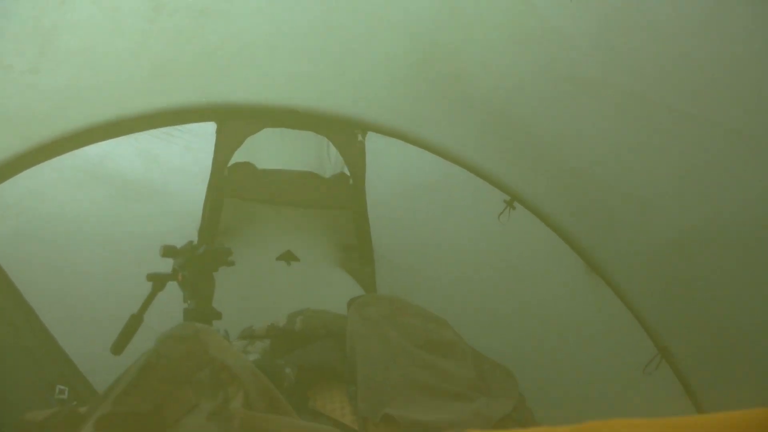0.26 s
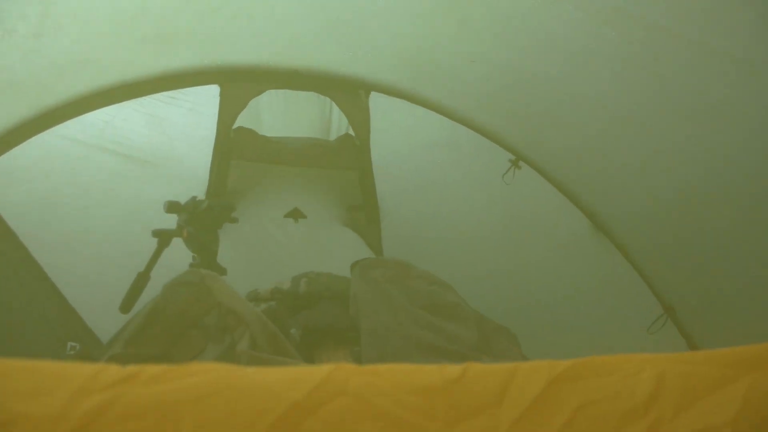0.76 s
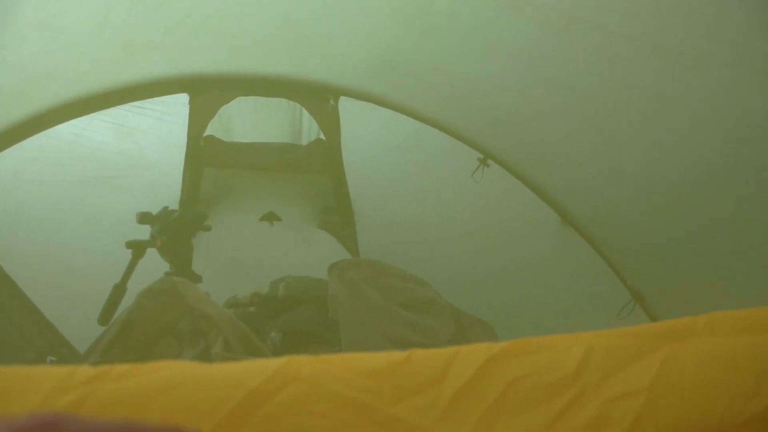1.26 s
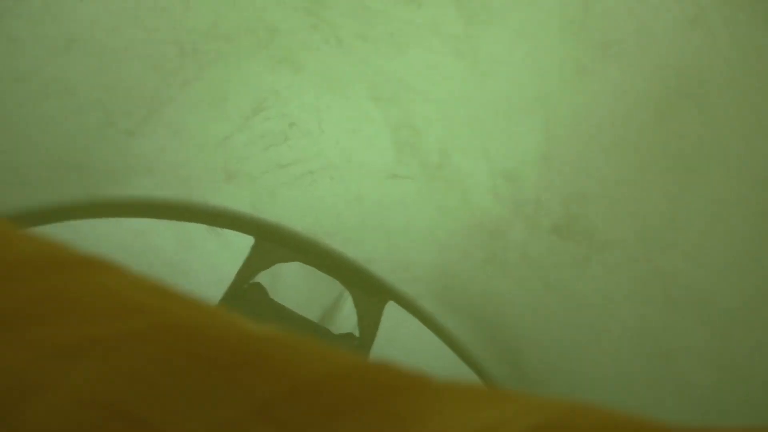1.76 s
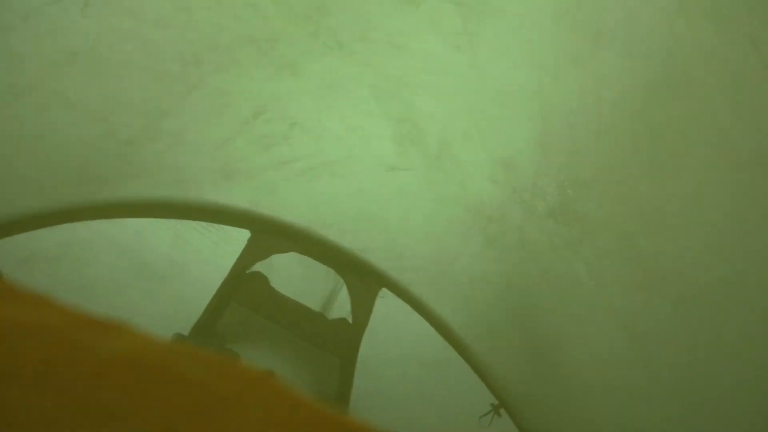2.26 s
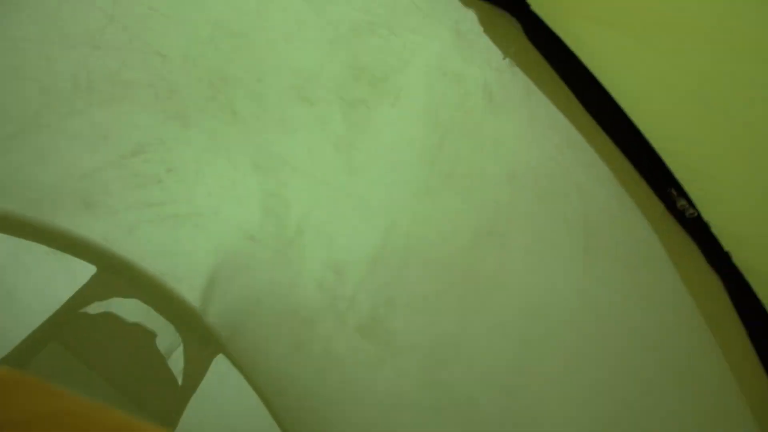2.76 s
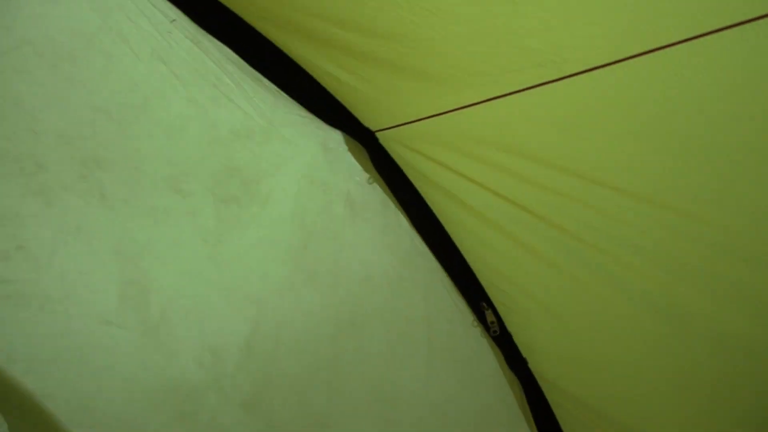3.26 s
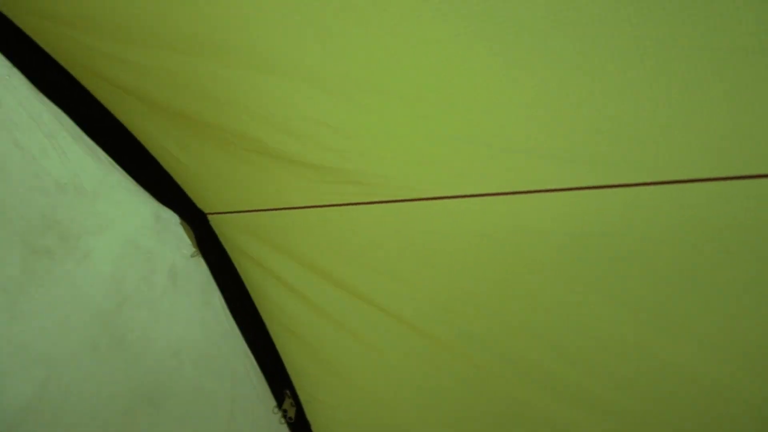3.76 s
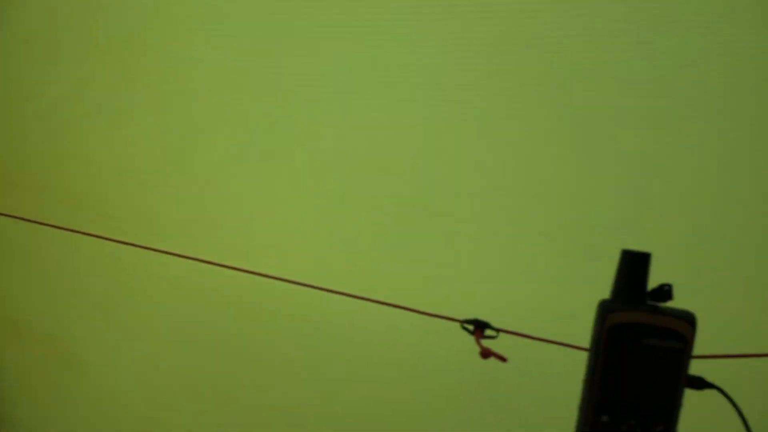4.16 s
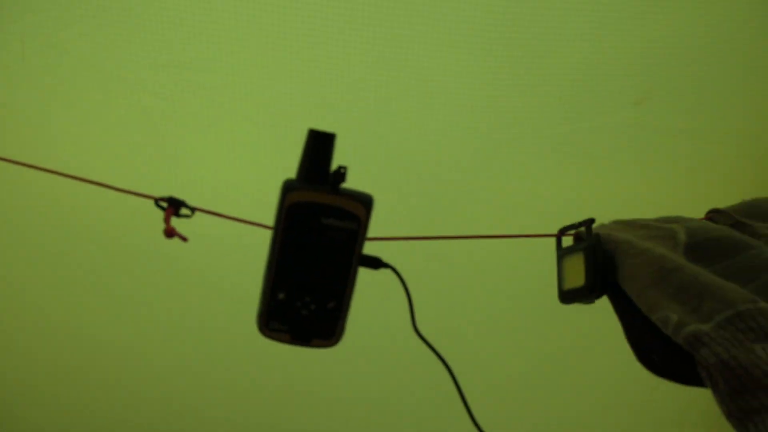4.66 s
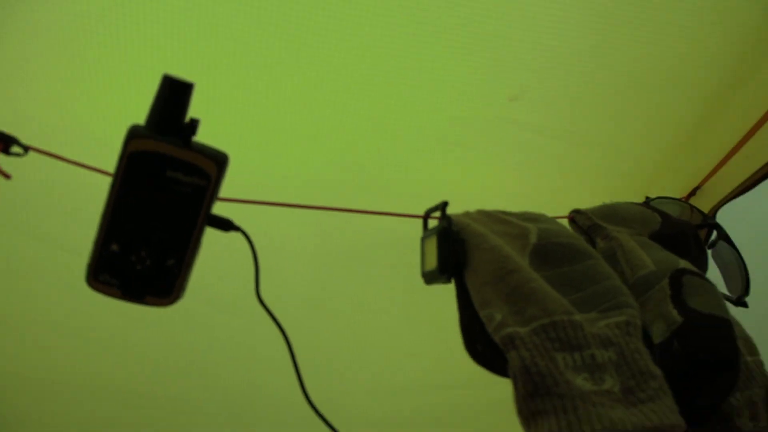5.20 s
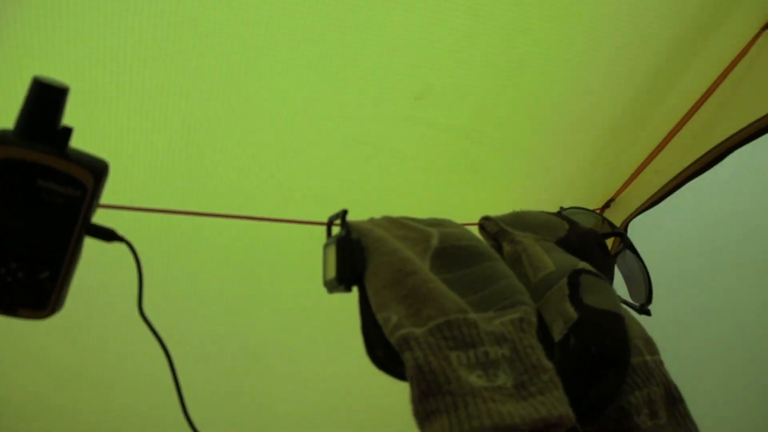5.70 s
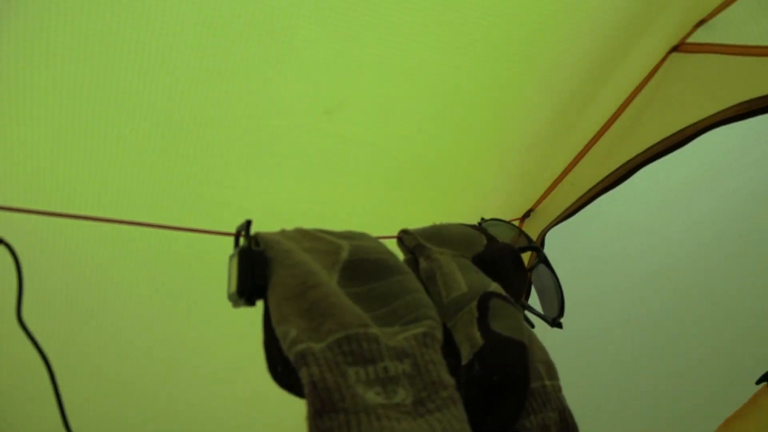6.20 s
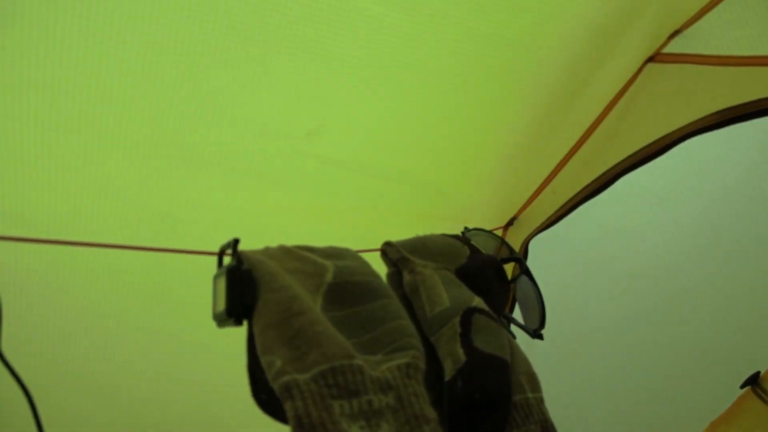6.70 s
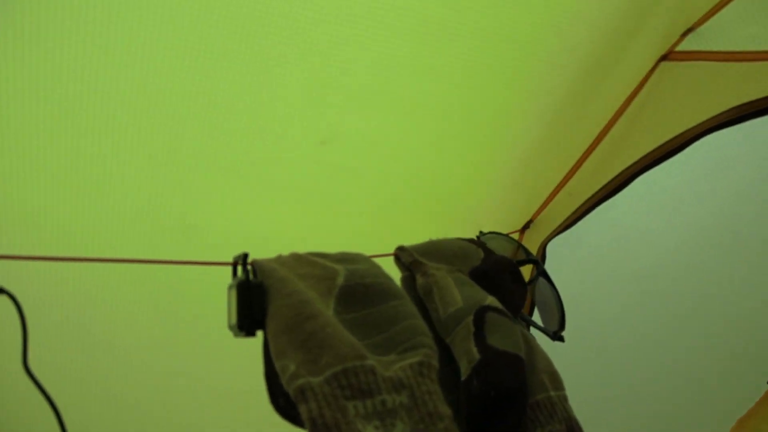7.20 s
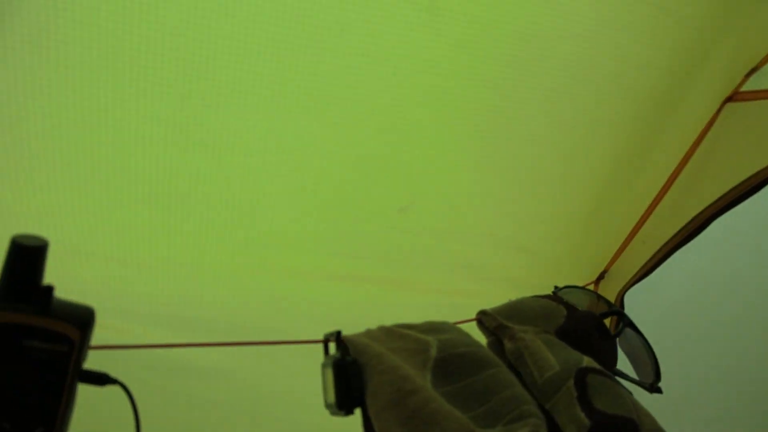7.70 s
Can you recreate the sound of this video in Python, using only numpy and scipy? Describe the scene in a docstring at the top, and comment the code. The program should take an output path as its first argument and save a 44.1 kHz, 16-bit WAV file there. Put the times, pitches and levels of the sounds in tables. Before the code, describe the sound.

Strong wind buffets a small nylon tent, heard from inside, with flapping walls, deep thumping gusts and rain pattering on the fly.

```python
"""Inside a small nylon tent in a storm. A pressure surge opens the scene; gusts pump the enclosed air,
the walls flap and rustle, rain patters on the fly and the wind roars outside. At 1.5 s a brief silence
marks the cut to a second shot, nearer the wall. Cloth slaps taut, heavy drops tap and metal zip pulls
chink. After 5 s the slaps grow rare and the roar eases; near 6.2 s the strongest surge overloads the
nearly mono microphone. The buffeting and the rain go on to the end."""
import sys
import numpy as np
from scipy import signal
from scipy.fft import rfft, irfft, next_fast_len
from scipy.io import wavfile
from scipy.ndimage import uniform_filter1d, map_coordinates

SR = 44100
rng = np.random.default_rng(int(sys.argv[2]) if len(sys.argv) > 2 else 0)


def transcribe(signal):
    """Save signal, clipped to [-1, 1], as a 16-bit WAV file at the path in sys.argv[1]."""
    frames = np.atleast_2d(signal).T
    limited = np.clip(frames, -1, 1)
    pcm = np.round(limited * 32767).astype(np.int16)
    wavfile.write(sys.argv[1], SR, pcm)


N = 350506

# Course of the storm, one list per shot: time_s, pump_db, flap_db, roar_db, rain_db
STORM_LEVELS = [
    [(0.0, -7, -25.5, -27, -38.5), (0.4, -12, -23.5, -25.5, -41.5), (1.0, -11, -29, -25, -41.5),
     (1.53, -14, -33, -25, -41)],
    [(1.565, -9.5, -21.5, -22.5, -27), (1.7, -10, -24, -22.5, -33), (2.2, -10, -23, -19, -28),
     (2.45, -11, -20.5, -20.5, -29), (2.7, -12.5, -20, -20.5, -31), (3.1, -13.5, -17.5, -22, -31),
     (3.6, -13, -21, -22, -34.5), (4.15, -16, -22, -20, -31), (4.5, -15.5, -17.5, -21.5, -36.5),
     (4.9, -13, -19.5, -24, -33.5), (5.38, -13.5, -20.5, -23, -35), (5.52, -13, -19.5, -21.5, -33.5),
     (5.7, -12, -18.5, -23, -36), (5.9, -14, -21, -25, -31), (6.15, -11.5, -18, -21.5, -31),
     (6.5, -15, -15.5, -24.5, -35), (6.75, -13.5, -21, -24.5, -32.5), (6.95, -14, -19, -25, -34),
     (7.4, -14, -22.5, -26, -34), (7.75, -15, -23, -25, -35), (7.9, -14.5, -18.5, -25, -36.5)],
]
# Gusts swelling the pumping: centre_s, rise_db
GUST_SWELLS = [(0.27, 0), (0.82, 0.5), (1.15, 8), (1.6, 6), (1.95, 2), (2.2, 5.5), (2.6, 2.5), (3.1, 7.5),
               (3.32, 8), (3.5, 5), (3.72, 4), (3.94, 4.5), (4.35, 2), (4.57, -2.5), (4.75, 5.5), (4.95, 7),
               (5.15, 3), (5.3, -0.5), (5.55, 6), (5.97, 3), (6.45, 5), (6.56, 5.5), (6.72, 4.5), (6.88, 5),
               (7.12, 4.5), (7.3, 4.5), (7.55, 5), (7.77, 4.5), (7.87, 4.5)]
# A wall thrown in or out: centre_s, level_db, half_width_s, signed_gain
WALL_SURGES = [(0.026, 0.5, 0.023, 1), (2.22, 1.2, 0.02, 0.77), (2.951, 4.5, 0.028, 0.53),
               (4.238, 2, 0.017, -0.84), (5.586, -0.5, 0.029, 0.88), (6.216, 2, 0.033, 1),
               (7.017, 0.5, 0.021, 0.87)]
# Cloth pulled taut: start_s, puff_db, crack_db, puff_t60_s
CLOTH_SLAPS = [(1.567, -9, -22, 0.13), (1.611, -20, -36, 0.06), (1.962, -18, -19, 0.078),
               (2.237, -11, -26, 0.083), (2.808, -8.5, -32, 0.055), (2.837, -4, -26, 0.062),
               (3.119, -10, -33, 0.038), (3.202, -13, -22, 0.12), (4.207, -15.5, -32, 0.07),
               (4.454, -16.5, -40, 0.064), (4.491, -8.5, -19, 0.047), (4.537, -10, -34, 0.065),
               (4.902, -18, -44, 0.073), (5.155, -14, -40, 0.06), (6.985, -16.5, -33, 0.078)]
# Cloth swinging after a hard tug: start_s, level_db, pitch_hz, t60_s
CLOTH_SWINGS = [(2.2435, -0.5, 226, .03), (2.8425, -7, 420, 0.018), (2.846, -6, 199, .04),
                (3.119, -2, 234, 0.055), (4.502, -3, 208, 0.042), (4.901, -4.5, 450, 0.023)]
# Folds cracking: start_s, level_db, time_scale_ms, signed_gain
FOLD_SNAPS = [(0.2345, -16, 0.076, 1), (0.2363, -6, 0.21, -1), (2.2413, 3, 0.2, 1),
              (2.8378, -4, 0.45, 0.88), (4.4952, -1.5, 0.33, -0.92), (4.5397, -1.5, 0.25, -0.77),
              (5.158, -2, 0.31, -1), (5.2492, -17, 0.089, 1), (6.8563, -4, 0.22, -1.2),
              (6.8885, -11, 0.1, 0.85)]
# Heavy drops on the fly: start_s, tap_db, splash_db
HEAVY_DROPS = [(0.0388, -24, -45), (0.199, -20.5, -41.5), (0.2341, -21, -31), (0.7057, -24, -56),
               (1.9657, -10.5, -33), (2.0896, -18, -40), (2.164, -22, -45), (2.242, -22, -30),
               (2.4586, -21, -49), (2.5476, -21, -40), (2.5556, -16, -39), (2.6379, -16.5, -45),
               (2.6953, -22, -53), (2.8873, -25, -49), (3.2081, -16, -50), (3.262, -21, -45),
               (3.2955, -24, -37), (3.418, -30, -38), (3.71, -20, -47), (3.885, -23, -50),
               (3.7818, -24, -48), (4.2852, -18, -50), (4.5945, -16, -45), (4.7514, -19, -44),
               (4.774, -29, -32), (5.1373, -18, -45), (5.2027, -15.5, -41), (5.248, -17, -41.5),
               (5.7956, -17, -47.5), (5.8676, -15.5, -49), (5.9379, -18, -44), (6.0424, -17, -45),
               (6.0611, -20, -48), (6.1155, -15, -51), (6.156, -25, -44), (6.1773, -18, -45.5),
               (6.7, -24, -46), (6.75, -29, -52), (6.855, -22, -45), (6.888, -16.5, -57),
               (6.9466, -19, -43), (7.5026, -16, -51)]
# Zip pulls: pitch_hz, t60_s, touches (start_s, level_db)
ZIP_PULLS = [(14100, .04, [(1.724, -44), (1.857, -45), (1.946, -38), (2.617, -39), (2.627, -41),
             (2.81, -43), (2.979, -40), (3.415, -23), (3.536, -46), (4.693, -33), (4.903, -43)]),
             (8210, .08, [(1.947, -42), (2.567, -34)]), (7120, .06, [(3.438, -34)]),
             (5900, .04, [(1.724, -27), (3.414, -24)]), (4070, .022, [(.2345, -18)]),
             (3600, .02, [(.2335, -11)])]
# Nylon sliding over nylon: centre_s, rise_db, half_width_s
NYLON_SWISHES = [(0.055, 10, .015), (1.73, 9, 0.043), (1.97, 4, .02), (2.13, 3, .02), (2.215, 8, .015),
                 (2.53, 6, .02), (2.564, 8, .025), (2.67, 4, .03), (2.8, 5, 0.018), (3.07, 5, .03),
                 (3.31, 10.5, .05), (3.41, 5, .05), (4.1, 2, 0.11), (4.2, 5, .03), (4.69, 3, .02),
                 (4.95, 7, .03), (5.09, 6, 0.023), (5.96, 4, .03), (6.18, 2, .04), (6.63, 4, 0.036),
                 (6.7, 4, .01), (6.955, 6, 0.018), (7.14, 5, .03), (7.47, 3, .02), (7.728, 13, 0.033),
                 (7.865, 7, .015)]
# Dips of the steady sounds after the hardest blows: start_s, depth_db
LEVEL_DIPS = [(0.05, 3.5), (2.25, 8.5), (2.855, 4.5), (3.14, 4), (4.26, 2), (5.6, 4), (6.22, 9),
              (7.03, 0.5)]

# Spectral shapes: frequency_hz, relative_density_db
PUMP_SPECTRUM = [(1.8, -42), (3.0, 1), (27, -1.5), (34, -5), (40, -1), (47, -7.5), (100, -16), (130, -37),
                 (220, -120)]  # enclosed air
FLAP_SPECTRUM = [(47, -9), (80, -9.5), (108, 0.5), (167, 1), (500, -12.5), (650, -34), (1100, -120)]  # flapping walls
PUFF_SPECTRUM = [(60, -50), (200, 5.5), (400, 8.5), (900, 8), (1800, -3.5), (3000, -41)]  # body of a slap
TAP_SPECTRUM = [(700, -25), (1800, 6), (3500, -2.5), (5500, -8), (7500, -21.5), (10000, -28), (16000, -50)]  # a drop striking the fly
ROAR_SPECTRUM = [(150, -18), (350, -4.5), (600, -2), (950, 1), (1400, -3.5), (2100, -8.5), (3000, -17),
                 (5000, -28.5), (9000, -68)]  # wind outside
PATTER_SPECTRUM = [(500, -11.5), (1200, -1.5), (2200, -2.5), (2800, -4), (3600, -2.5), (4300, -11.5),
                   (5500, -13.5), (7000, -23), (9000, -32.5), (16000, -70)]  # rain, and the crack of a slap
RUSTLE_SPECTRUM = [(2000, -26), (5000, 10.5), (8000, 0), (11000, -0.5), (13000, -4.5), (15700, -11)]  # rubbing nylon, and splashes
HISS_SPECTRUM = [(2000, -30), (6000, -6), (12000, -2), (15700, -5)]  # microphone self-noise
# Stereo width: frequency_hz, side_over_mid_db
STEREO_WIDTH = [(60, -32.5), (500, -25), (2000, -26), (5000, -38), (9000, -47), (15000, -24)]
# Stereo balance: frequency_hz, left_over_right_db
STEREO_BALANCE = [(25, -.4), (125, -.8), (500, -.7), (1000, -.5), (2000, -.3), (4000, -.1)]

GAP_START_S, GAP_END_S = 1.5319, 1.5648  # silence between the two shots
TIME_S = np.arange(N) / SR


def air_pumping(level_db, duck):
    """Compression: gusts squeeze the tent like a bag of air; taut cloth limits the widest swings."""
    pressure = duck * amp(level_db + wobble(8)) * noise(PUMP_SPECTRUM)
    return 1.41 * np.tanh(pressure / 1.316)


def wall_surges(pumping):
    """Air displacement: a thrown wall adds a push and a rebound that briefly displace the pumping."""
    pulses, calm = np.zeros(N), np.ones(N)
    for centre_s, level_db, half_width_s, signed_gain in WALL_SURGES:
        u = (TIME_S - centre_s) / half_width_s
        push, rebound = np.exp(-6 * u ** 2), 0.5 * np.exp(-6 * (u - .8) ** 2)
        pulses += signed_gain * amp(level_db) * (push - rebound)
        calm *= 1 - np.exp(-1.5 * (u - .3) ** 2)
    return calm * pumping + pulses


def wall_flapping(level_db):
    """Forced vibration: wind shakes the walls, which radiate an uneven low noise."""
    gain = amp(level_db + 1.5 * wobble(10) + 1.1 * wobble(30))
    shaking = patches(spread_db=1.06) + 0.43 * grains(90, spread_db=2.5, t60_s=0.038)
    return gain * coloured(shaking, FLAP_SPECTRUM)


def cloth_slaps():
    """Impulsive tension: a dull puff under a shorter, brighter crack; hard tugs set the cloth swinging."""
    start_s, puff_db, crack_db, t60_s = np.transpose(CLOTH_SLAPS)
    puff = bursts(start_s, puff_db, t60_s, attack_s=0.00088) * noise(PUFF_SPECTRUM)
    crack = bursts(start_s, crack_db, .5 * t60_s, attack_s=.0008) * noise(PATTER_SPECTRUM)
    return puff + crack + rings(CLOTH_SWINGS, attack_s=0.00067, phase_step_rad=0.0069)


def fold_snaps():
    """Pulse radiation: a cracking fold gives the air one push, followed by its recoil."""
    out, t = np.zeros(N + SR), np.arange(SR // 50) / SR
    for start_s, level_db, time_scale_ms, signed_gain in FOLD_SNAPS:
        u = t * 1000 / time_scale_ms
        pulse = 2 * u * (2 - u) * np.exp(-u) * (1 - np.exp(-3 * u))
        out[round(start_s * SR):][:len(t)] += signed_gain * amp(level_db) * pulse
    return out[:N]


def drop_taps(rain_db, lesser_count=40):
    """Impact on a membrane: drops tap the fly and splash; lesser, random ones follow the rain's level."""
    when, size = rng.random((lesser_count, 2)).T
    lesser_db = rain_db[(when * (N - 1)).astype(int)] + 9 * (size - .5)
    lesser_drops = np.transpose([when * N / SR, lesser_db, lesser_db - 24])
    start_s, tap_db, splash_db = np.vstack([HEAVY_DROPS, lesser_drops]).T
    tap = bursts(start_s, tap_db, t60_s=0.016, attack_s=0.00019) * noise(TAP_SPECTRUM)
    splash = bursts(start_s, splash_db, t60_s=0.022, attack_s=.0003) * noise(RUSTLE_SPECTRUM)
    return tap + splash


def zip_chinks():
    """Free vibration: each small metal tab rings, slightly rough, at its own natural frequency."""
    strikes = [(start_s, level_db, pitch_hz, t60_s)
               for pitch_hz, t60_s, touches in ZIP_PULLS for start_s, level_db in touches]
    return rings(strikes, attack_s=.0015, phase_step_rad=.1)


def wind_roar(level_db):
    """Turbulence: the wind outside makes a broad, uneven band of noise."""
    eddies = patches(spread_db=0.86) + 0.4 * grains(150, spread_db=-5.0, t60_s=0.02)
    return amp(level_db) * coloured(eddies, ROAR_SPECTRUM)


def rain_patter(level_db):
    """Superposition: many small impacts merge into a patter, brighter near the wall."""
    impacts = 0.56 * patches(spread_db=0.9) + 0.47 * grains(500, spread_db=4.0, t60_s=0.012)
    patter = coloured(impacts, PATTER_SPECTRUM)
    treble = filtered(patter, lambda hz: 1 / (1 + (4200 / (hz + 1)) ** 6))
    return amp(level_db) * (patter + np.where(TIME_S < GAP_END_S, -.3, .1) * treble)


def nylon_rustle(level_db):
    """Friction: nylon makes a crisp hiss that swells as one layer slides over another."""
    rubbing = 1.04 * patches(spread_db=3.0) + 0.57 * grains(300, spread_db=6.0, t60_s=0.0043)
    return amp(level_db + swells(NYLON_SWISHES)) * coloured(rubbing, RUSTLE_SPECTRUM)


def storm_background(roar_db, rain_db):
    """Common modulation: the shaking wall makes roar, rain and rustle flutter together, more so nearby."""
    nearness = np.where(TIME_S > GAP_END_S, 1, .3)
    flutter, sway = nearness * wobble(40), nearness * wobble(9)
    rustle_db = -50.5 + 0.85 * (rain_db + 34.5)  # grows with the rain
    return (wind_roar(roar_db + 0.31 * flutter + 0.98 * sway)
            + rain_patter(rain_db + 1.1 * flutter + 0.63 * sway)
            + nylon_rustle(rustle_db + 2.2 * flutter + .8 * sway))


def ducking(fall_s=0.0089, recover_s=0.13):
    """Gain reduction: the steady sounds dip quickly after the hardest blows and creep back."""
    dip_db = np.zeros(N)
    for start_s, depth_db in LEVEL_DIPS:
        age_s = np.maximum(TIME_S - start_s, 0)
        dip_db += depth_db * (1 - np.exp(-age_s / fall_s)) * np.exp(-(age_s / recover_s) ** 1.2)
    return amp(-dip_db)


def amp(db):
    """Decibel law: level to amplitude."""
    return 10 ** (np.asarray(db) / 20)


def unit(x):
    """Normalisation to rms 1."""
    return x / np.sqrt(np.mean(x ** 2) + 1e-20)


def along(points, hz):
    """Interpolation of (frequency_hz, value) points on a logarithmic axis."""
    frequency_hz, values = np.transpose(points)
    return np.interp(np.log(hz + 1), np.log(frequency_hz + 1), values)


def wobble(knots_per_s):
    """Random modulation: a smooth curve through Gaussian knots."""
    knots = rng.standard_normal(int(N * knots_per_s / SR) + 4)
    return map_coordinates(knots, [TIME_S * knots_per_s])


def swells(rows):
    """Gaussian rises of level, summed in dB."""
    return sum(rise_db * np.exp(-((TIME_S - centre_s) / half_width_s) ** 2)
               for centre_s, rise_db, half_width_s in rows)


def filtered(x, response):
    """Linear filtering: the spectrum of x times a frequency response."""
    size = next_fast_len(N + SR // 2)
    return irfft(rfft(x, size) * response(np.fft.rfftfreq(size, 1 / SR)), size)[..., :N]


def coloured(x, spectrum):
    """Spectral shaping of x, at rms 1."""
    return unit(filtered(x, lambda hz: amp(along(spectrum, hz))))


def noise(spectrum):
    """Gaussian noise of the given spectrum, at rms 1."""
    return coloured(rng.standard_normal(N), spectrum)


def patches(spread_db):
    """Modulated noise: patches of random gain in time and frequency."""
    bins = signal.stft(rng.standard_normal(N + 512), nperseg=512)[2]
    field = uniform_filter1d(rng.standard_normal(bins.shape), size=8, axis=0)
    field = uniform_filter1d(field, size=6, axis=1)
    return signal.istft(bins * amp(spread_db * unit(field)), nperseg=512)[1][:N]


def grains(per_s, spread_db, t60_s):
    """Poisson process: short noise bursts of random size at random moments."""
    hits = rng.random(N) < per_s / SR
    sizes = hits * amp(spread_db * np.minimum(rng.exponential(size=N), 4))
    t = np.arange(SR // 20) / SR
    envelope = signal.fftconvolve(sizes, amp(-60 * t / t60_s))[:N]
    return unit(envelope * rng.standard_normal(N))


def bursts(start_s, level_db, t60_s, attack_s):
    """Exponential decay: the summed envelope of a series of blows."""
    envelope, t = np.zeros(N + SR), np.arange(SR // 4) / SR
    for at_s, db, decay_s in np.broadcast(start_s, level_db, t60_s):
        envelope[round(at_s * SR):][:len(t)] += amp(db - 60 * t / decay_s) * (1 - np.exp(-t / attack_s))
    return envelope[:N]


def rings(rows, attack_s, phase_step_rad):
    """Damped oscillation: decaying tones whose phase takes a random walk."""
    out, t = np.zeros(N + SR), np.arange(SR // 8) / SR
    for start_s, level_db, pitch_hz, t60_s in rows:
        drift = phase_step_rad * np.cumsum(rng.standard_normal(len(t)))
        envelope = amp(level_db - 60 * t / t60_s) * (1 - np.exp(-t / attack_s))
        out[round(start_s * SR):][:len(t)] += envelope * np.sin(2 * np.pi * pitch_hz * t + drift)
    return out[:N]


def narrow_stereo(mid):
    """Decorrelation: a faint side signal follows the level of the mid, but with random phase."""
    bins = signal.stft(mid, nperseg=1024)[2]
    scrambled = signal.istft(bins * np.exp(2j * np.pi * rng.random(bins.shape)), nperseg=1024)[1][:N]
    side = filtered(scrambled, lambda hz: amp(along(STEREO_WIDTH, hz)))
    pair = filtered(mid, lambda hz: amp(np.outer([.5, -.5], along(STEREO_BALANCE, hz))))
    return pair + [side, -side]


def scene():
    """Superposition: the pressures of all sources add inside the tent."""
    time_s, *levels = np.vstack(STORM_LEVELS).T
    pump_db, flap_db, roar_db, rain_db = (np.interp(TIME_S, time_s, db) for db in levels)
    gust_db = swells((centre_s, rise_db, 0.05) for centre_s, rise_db in GUST_SWELLS)
    duck = ducking()
    air = wall_surges(air_pumping(pump_db + gust_db, duck))
    steady = wall_flapping(flap_db + 0.2 * gust_db) + storm_background(roar_db, rain_db)
    blows = cloth_slaps() + fold_snaps() + drop_taps(rain_db) + zip_chinks()
    return narrow_stereo(air + duck * steady + blows)


def record(dry):
    """Self-noise, clipping and band limiting, with a brief silence at the cut between the two shots."""
    common, apart = coloured(rng.standard_normal((2, N)), HISS_SPECTRUM)
    hiss = amp(-60) * common + amp(-65) * np.array([apart, -apart])
    pressure = dry + ducking() * hiss
    clipped = np.clip(pressure, -.98, .98)
    overloaded = np.clip(clipped + .12 * (pressure - clipped), -1, 1)  # a trace survives on the flat tops
    outside_gap = (TIME_S < GAP_START_S) | (TIME_S > GAP_END_S)
    return filtered(overloaded * outside_gap, lambda hz: hz < 15708)


dry = scene()
out = record(dry)
transcribe(out)
```